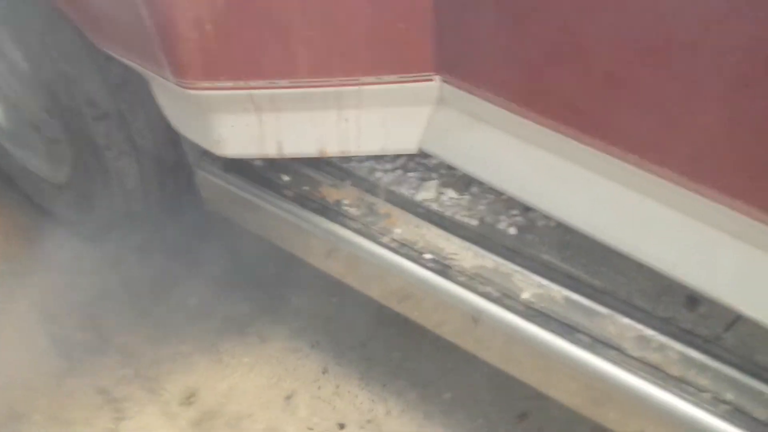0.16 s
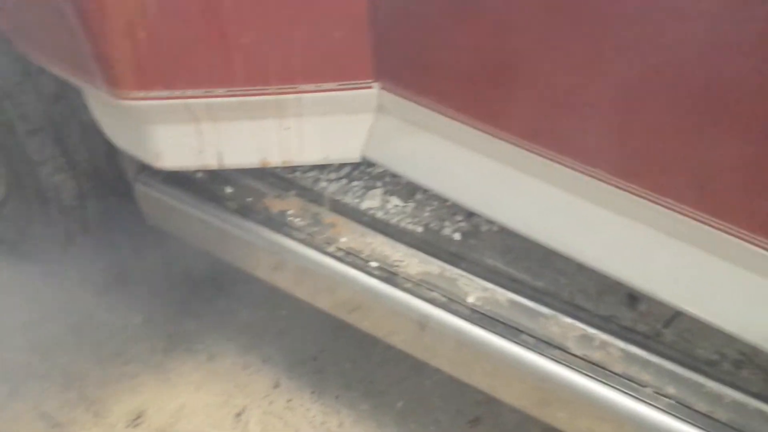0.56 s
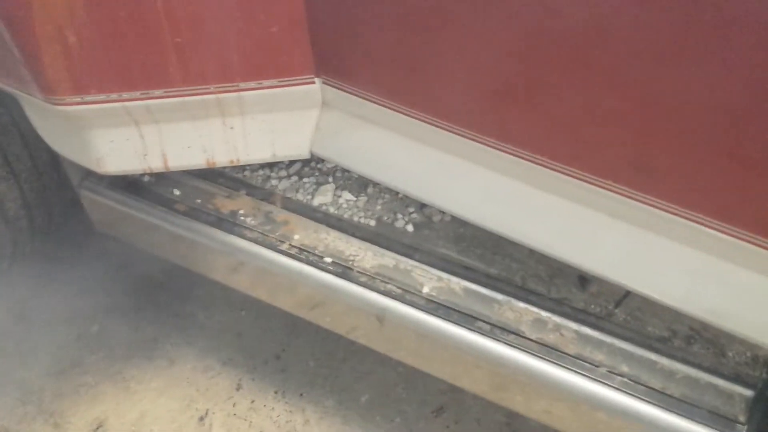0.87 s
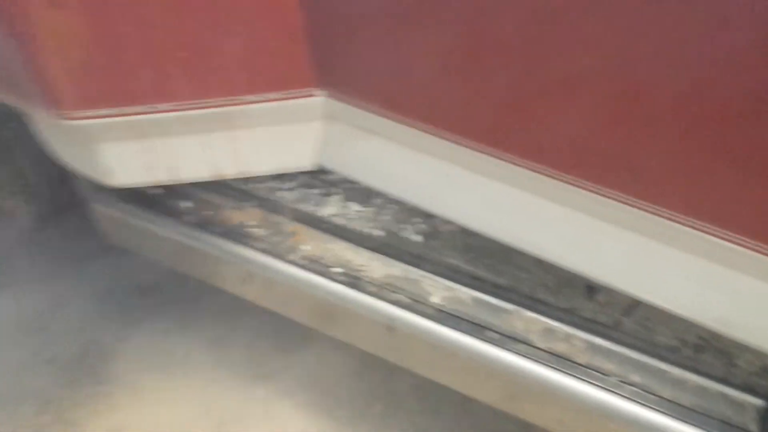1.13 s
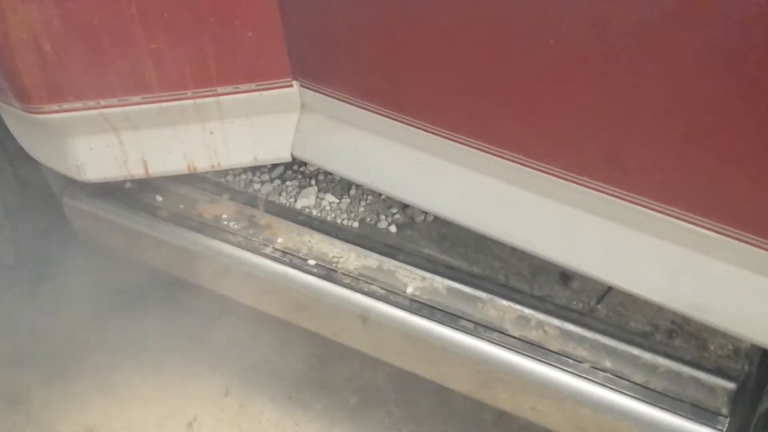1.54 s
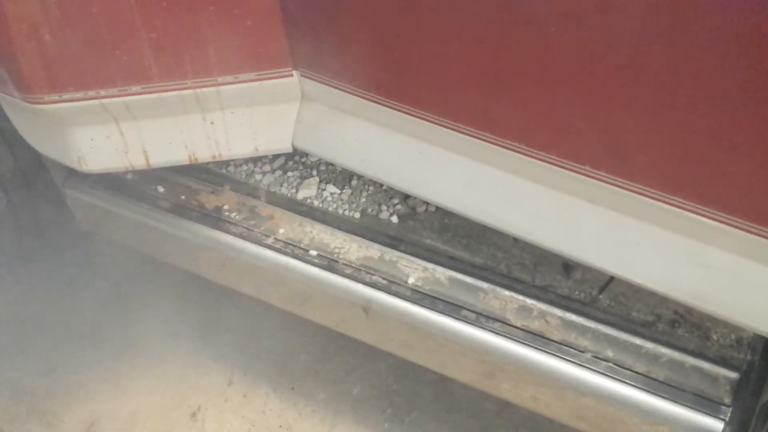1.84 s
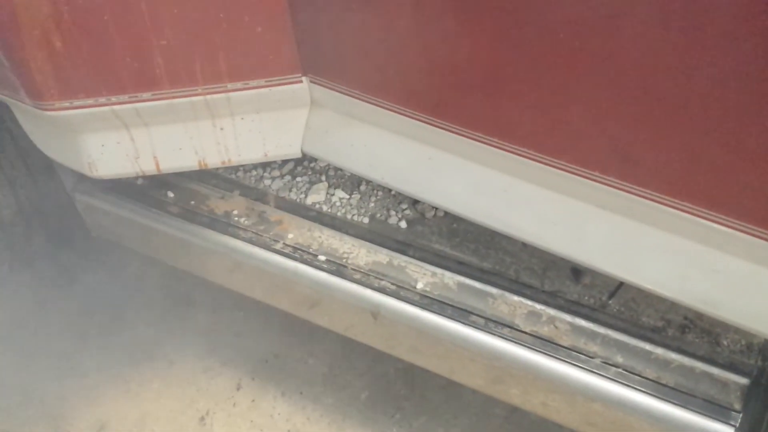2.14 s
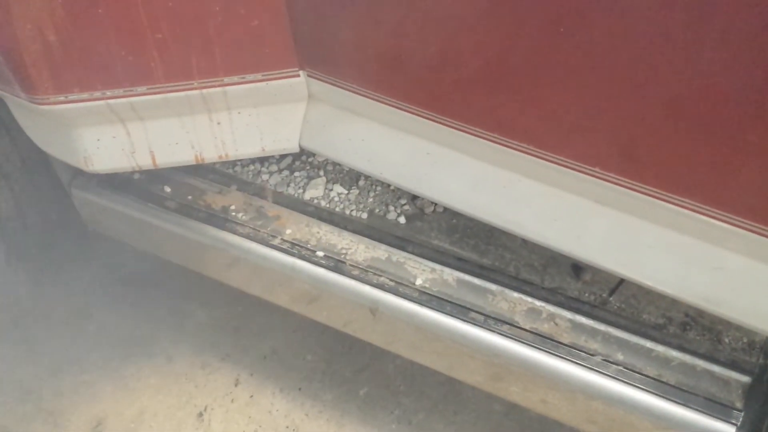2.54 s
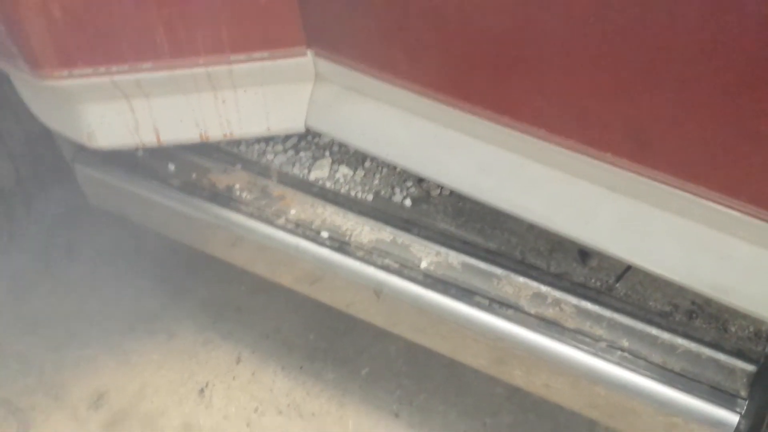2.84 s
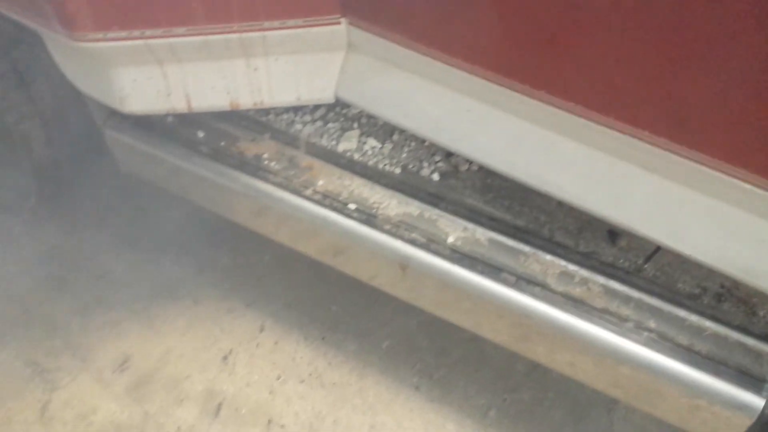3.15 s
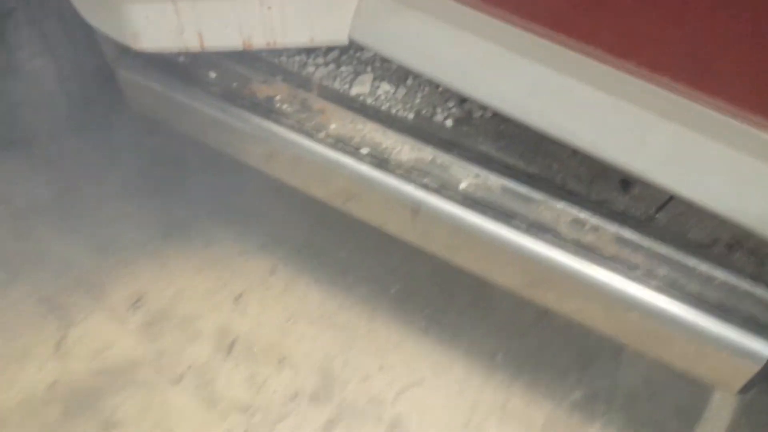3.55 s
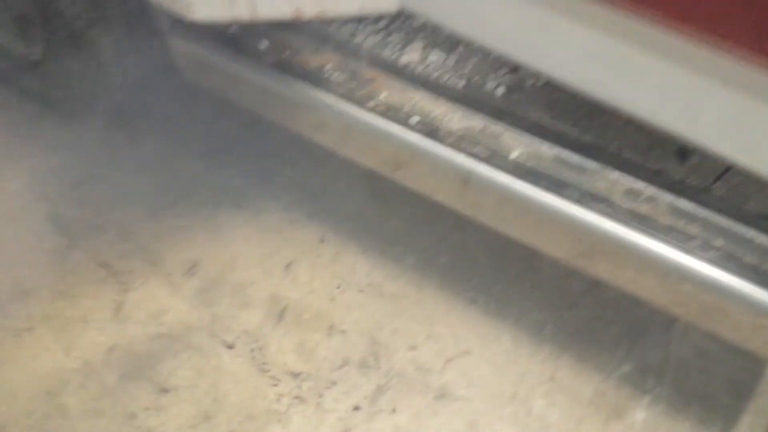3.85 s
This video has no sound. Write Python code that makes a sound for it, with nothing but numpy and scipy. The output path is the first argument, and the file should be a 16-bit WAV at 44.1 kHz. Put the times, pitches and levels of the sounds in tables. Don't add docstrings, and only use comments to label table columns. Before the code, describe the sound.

A diesel truck engine idles close by, deep rapid throbbing with metallic clatter and a faint seeping whistle. At about 1.0 s a bright, forceful air purge bursts out, buffeting the phone microphone with low thuds until 1.2 s, and fades by about 1.6 s. The engine, ducked and slightly faster, stays quiet until 2.3 s, then swells back by 3 s, its knocking clearer to 4 s.

```python
import sys
import numpy as np
from scipy import signal
from scipy.fft import rfft, irfft
from scipy.io import wavfile
from scipy.ndimage import uniform_filter1d

SR = 44100
rng = np.random.default_rng(int(sys.argv[2]) if len(sys.argv) > 2 else 0)


def wav_out(sig):
    wavfile.write(sys.argv[1], SR, np.round(np.clip(np.atleast_2d(sig).T, -1, 1) * 32767).astype(np.int16))


def ratio_of_db(decibels):
    return 10 ** (np.asarray(decibels, float) / 20)


N = 176400
T = np.arange(N) / SR
F = np.fft.rfftfreq(N, 1 / SR) + 1e-3
PURGE_S = 1.015
BASS_LAG_S = .0001


def curve(rows, col=1, at=T):
    rows = np.array(rows, float)
    return np.interp(at, rows[:, 0], rows[:, col])


def unit(x):
    return x / np.sqrt(np.mean(x ** 2))


def colour(x, points):
    hz, db = np.array(points, float).T
    gain_db = np.interp(np.log(F), np.log(hz), db)
    return irfft(rfft(x) * ratio_of_db(gain_db), N)


def air(alike_hz=665, lag_s=0.000364):
    common, left, right = rfft(rng.standard_normal((3, N)))
    floor = 0.12
    share = np.clip(floor + (1 - floor) / (1 + (F / alike_hz) ** 3), 0, 1)
    late = np.exp(-2j * np.pi * F * lag_s)
    shared = np.sqrt(share) * common * np.array([np.ones_like(late), late])
    own = np.sqrt(1 - share) * np.array([left, right])
    return irfft(shared + own, N)


def walk(rate_hz):
    k = int(SR / rate_hz)
    return unit(uniform_filter1d(uniform_filter1d(rng.standard_normal(N), k), k))


def rings(x, modes, order, mix=1):
    spec = rfft(x)
    out = 0
    for hz, width_hz, *db in modes:
        response = 1 / (1 + 1j * (F / hz - hz / F) * hz / width_hz) ** order
        gain_db = db[0] + (db[-1] - db[0]) * mix
        out = out + ratio_of_db(gain_db) * unit(irfft(spec * response, N))
    return out


def train(at, level_db):
    out = np.zeros(N)
    out[np.clip(at, 0, N - 1).astype(int)] = ratio_of_db(level_db)
    return out


def firings():
    # start_s, firing_hz
    speed = [
        (0, 41.55),
        (.3, 41.4),
        (.7, 41.6),
        (1.05, 41.6),
        (1.3, 42.1),
        (1.5, 42.4),
        (2.1, 42.6),
        (3, 42.73),
        (4, 42.8),
    ]
    loud_firing_s = 3.481
    turns = np.cumsum(curve(speed)) / SR
    turns = np.floor(turns - turns[int(loud_firing_s * SR)]).astype(int)
    at = np.flatnonzero(np.diff(turns))
    return at, turns[at + 1] % 6


def exhaust(at, cyl, idle):
    puff_db = [.6, 0.45, -0.15, -0.52, -0.28, -0.25]
    # pitch_hz, width_hz, loaded_db, unloaded_db
    pipe_modes = [(42, 5, -0.5, -0.5), (83.6, 26, -6, -2), (128.8, 31, -16, -6.5), (216.3, 32, 0, -3),
                  (298, 24, -24, -30), (373.7, 24.3, -14, -16), (462.3, 10.6, -14, -20),
                  (509.5, 8.5, -9.5, -19.5)]
    # pitch_hz, width_hz, loaded_db, unloaded_db
    roar_modes = [(113.4, 60, -26.5, -29), (213.3, 50, -23.5, -24), (289.4, 125, -24.5, -26),
                  (495, 30, -33, -34), (415, 264, -30.5, -34.5)]
    level_db, scatter_db, jitter_s = -16, 0.7, 0.00019
    late, louder = rng.standard_normal((2, len(at)))
    puffs = -train(at + jitter_s * SR * late, np.array(puff_db)[cyl] + scatter_db * louder)
    pipe = ratio_of_db(level_db - 3) * rings(puffs, pipe_modes, order=2, mix=idle)
    both = np.array([pipe, np.roll(pipe, int(BASS_LAG_S * SR))])
    return both + rings(air(1200, BASS_LAG_S), roar_modes, order=2, mix=idle)


def clatter(at, cyl):
    # pitch_hz, level_db per Hz
    steady_colour = [(60, -21), (500, -1.5), (750, -8.5), (2000, -2.5), (3500, -7.5), (6000, -17.5),
                     (10500, -21), (13000, -30)]
    # pitch_hz, width_hz, level_db
    block_modes = [(985, 130, -7), (1753, 63, -8.5), (2232, 220, -5), (2990, 96, -10), (3720, 280, -11)]
    rung_by = [1, 3, 0, 0, 4]
    knock_db = [8, -10, -2.5, -10.5, 2, -8.5]
    # start_s, left_db, right_db
    turning = [
        (0, 0.5, -1.5),
        (1.8, 0.5, -1),
        (2.4, 1, 0.5),
        (3, 0, 1),
        (3.45, 1.5, 3),
        (4, 0, 3),
    ]
    level_db, metal_db, scatter_db = -25.5, -.5, 1.5
    lead_s, rise_s, fall_s = 0.0081, .008, .015
    s = T[:SR // 8]
    shape = (1 - np.exp(-s / rise_s)) * np.exp(-s / fall_s)
    shape = shape / shape.max()
    scatter = scatter_db * rng.standard_normal(len(at))

    def knock(places):
        hits = train(at - lead_s * SR, np.roll(knock_db, places)[cyl] + scatter)
        return signal.fftconvolve(hits, shape)[:N]

    steady = unit(colour(air(), steady_colour)) * ratio_of_db(.5 * walk(27))
    steady = steady * (1.11 + 0.33 * knock(0))
    shake = air(1000)
    metal = 0
    for mode, places in zip(block_modes, rung_by):
        metal = metal + rings(shake * (.22 + knock(places)), [mode], order=1)
    turn = ratio_of_db(np.array([curve(turning), curve(turning, col=2)]))
    return ratio_of_db(level_db) * (turn ** 0.66 * steady + ratio_of_db(metal_db) * turn ** 1.4 * metal)


def seep(idle):
    # pitch_hz, level_db per Hz
    hiss_colour = [(1500, -6), (3500, -2.5), (6000, -2.5), (9000, -3), (11000, -6.5), (13000, -41)]
    whistle_hz, width_hz, whistle_db, hiss_db = 5390, 570, -27.5, -26
    whistle = rings(air(2500), [(whistle_hz, width_hz, whistle_db)], order=2)
    hiss = unit(colour(air(), hiss_colour))
    return (T < PURGE_S) * (ratio_of_db(0.95 * walk(20)) * whistle + ratio_of_db(hiss_db) * hiss)


def purge():
    # after_opening_s, level_db
    flow_rows = [
        (0, -27),
        (.005, 0),
        (.012, 8),
        (.035, 17),
        (.1, 18.5),
        (.18, 15),
        (.31, 6.5),
        (.46, -3.5),
        (.7, -26),
    ]
    # pitch_hz, level_db per Hz
    jet_colour = [(300, -49), (900, -17.5), (1500, -10), (4000, 0), (6000, 2.5), (9000, 3.5), (14500, -2.5)]
    # pitch_hz, level_db
    jet_left = [(3000, 0.5), (6000, 0), (8000, 2), (13000, 17)]
    tail_db_per_s = 25
    thin_db_per_s, knee_hz = -1.5, 5960
    s = T - PURGE_S
    jet = unit(colour(air(1030), jet_colour))
    tail_db = tail_db_per_s * np.maximum(s - flow_rows[-1][0], 0)
    flow_db = curve(flow_rows, at=s) - tail_db + 0.63 * walk(23)
    spec = rfft(jet)
    out = 0
    for hz in 250 * 2. ** np.arange(7):
        octave = np.clip(1 - abs(np.log2(F / hz)), 0, 1)
        band = irfft(spec * octave, N)
        thin_db = thin_db_per_s * max(np.log2(knee_hz / hz), 0) * np.clip(s - .1, 0, 1)
        out = out + band * ratio_of_db(flow_db - thin_db + 0.27 * walk(37))
    return np.array([colour(out[0], jet_left), out[1]]) * (s > 0)


def buffet():
    start_s, length_s, rise_s, stop_s = 1.02, 0.177, 0.07, 0.027
    left_db, right_db = 5.5 - 14, 5.5
    rise = (T - start_s) / rise_s
    stop = (start_s + length_s - T) / stop_s
    env = np.clip(np.minimum(rise, stop), 0, 1)
    gust = rng.standard_normal((2, N)) * ratio_of_db(1.3 * walk(130))
    gust = colour(gust, [(35, -6), (120, 6), (900, -3), (3000, -12)])
    return unit(gust) * env * ratio_of_db([[left_db], [right_db]])


def scene():
    unload_s = .05
    at, cyl = firings()
    idle = np.clip((T - PURGE_S) / unload_s, 0, 1)
    return exhaust(at, cyl, idle) + clatter(at, cyl) + seep(idle) + purge() + buffet()


def band_limit(x):
    return signal.sosfilt(signal.butter(12, 14530, fs=SR, output="sos"), x)


def record(dry):
    # pitch_hz, level_db
    left_port = [(600, -3), (1100, 2), (2000, -1.5), (3800, -1.5), (5100, 3.5), (6000, -7.5), (7500, -9.5),
                 (12000, -39)]
    right_port = [(600, 3), (1100, 6), (2000, 0.5), (5600, 1), (6400, 5.5), (7100, 9), (8200, 2.5),
                  (12000, -1)]
    # start_s, level_db
    gain_rows = [(0, 0.5), (.992, -0.5), (1.014, -10), (1.04, -21), (1.2, -22.5), (1.33, -20.5),
                 (1.47, -15.5), (1.65, -14.5), (2.28, -14.5), (2.42, -9.5), (2.56, -6), (2.8, -2.5),
                 (3.05, -0.5), (4, -1.5)]
    ceiling = 0.78
    mix = np.array([colour(dry[0], left_port), colour(dry[1], right_port)])
    mix = mix * ratio_of_db(curve(gain_rows))
    mix = mix / (1 + abs(mix / ceiling) ** 4) ** .25
    return band_limit(mix)


dry = scene()
out = record(dry)
wav_out(out)
```